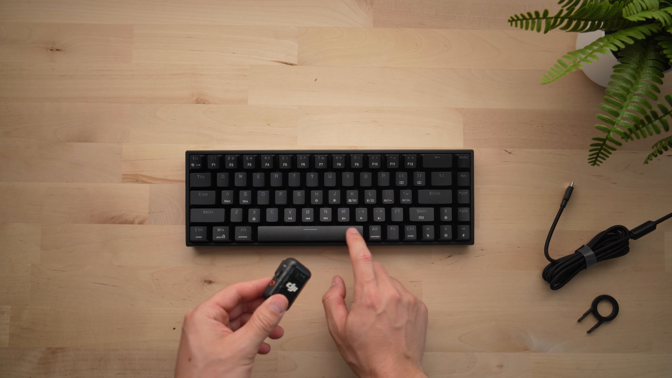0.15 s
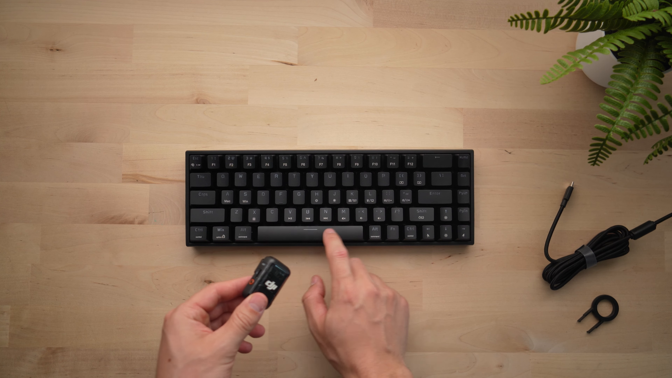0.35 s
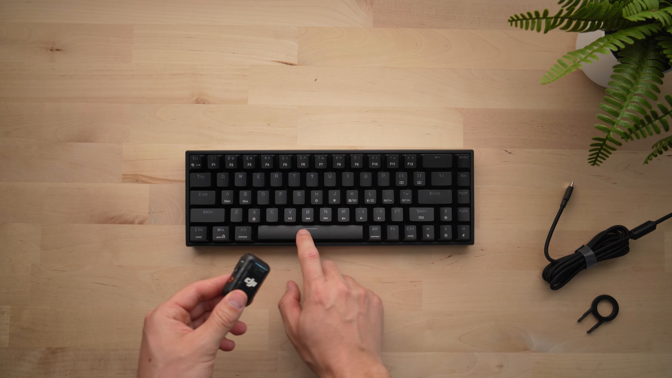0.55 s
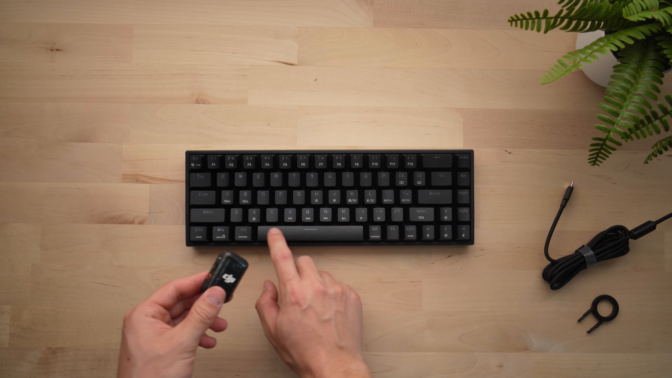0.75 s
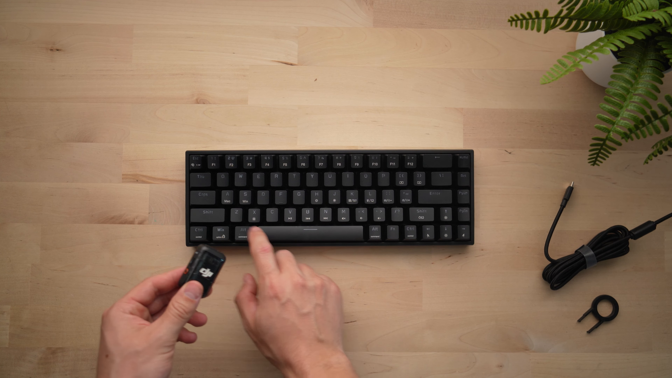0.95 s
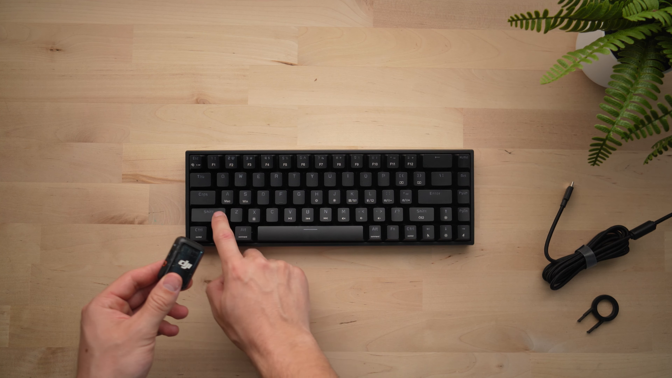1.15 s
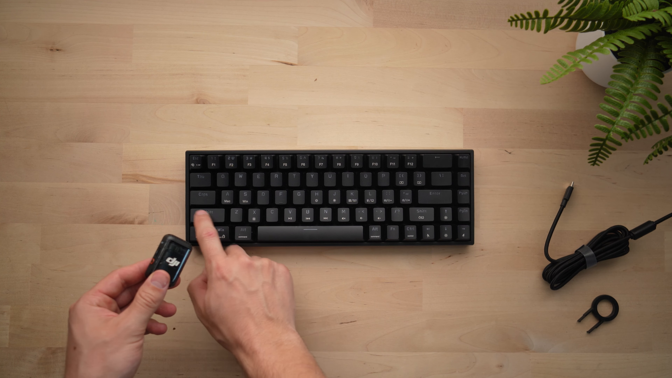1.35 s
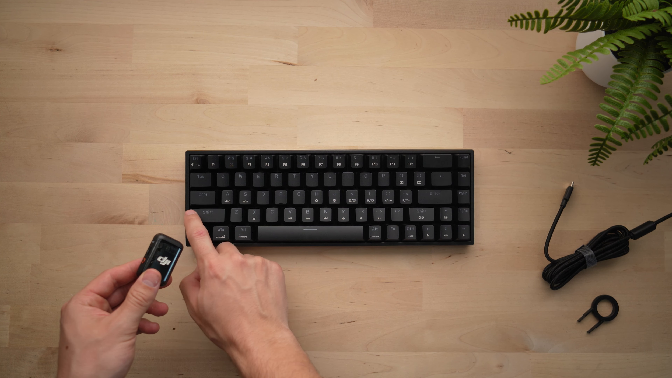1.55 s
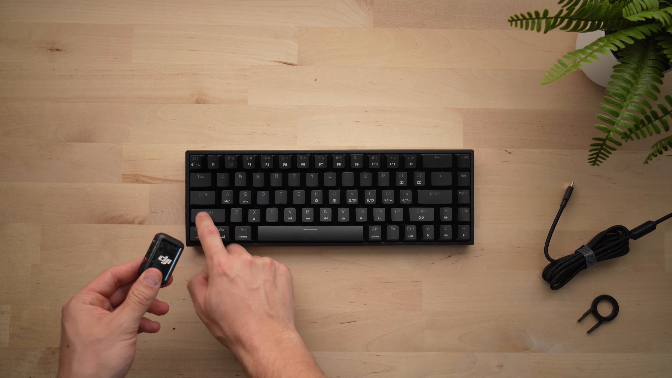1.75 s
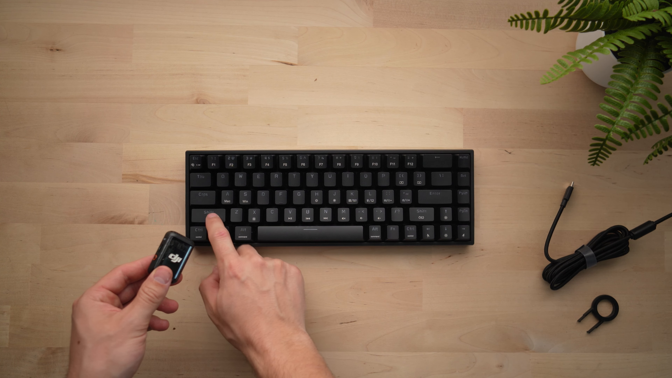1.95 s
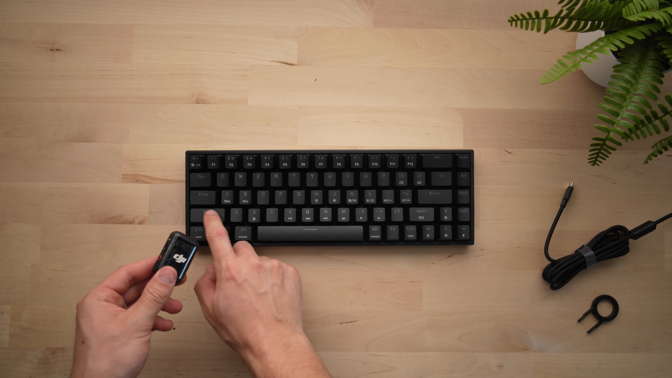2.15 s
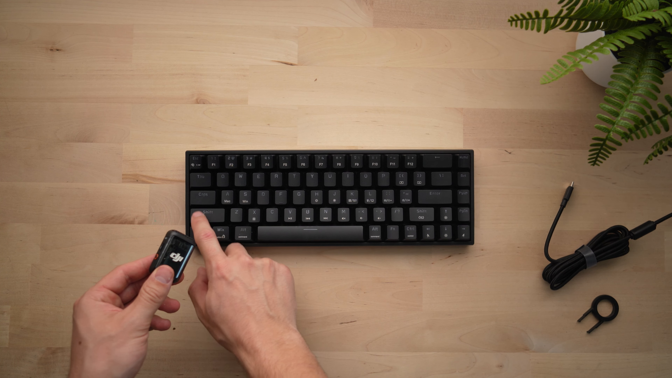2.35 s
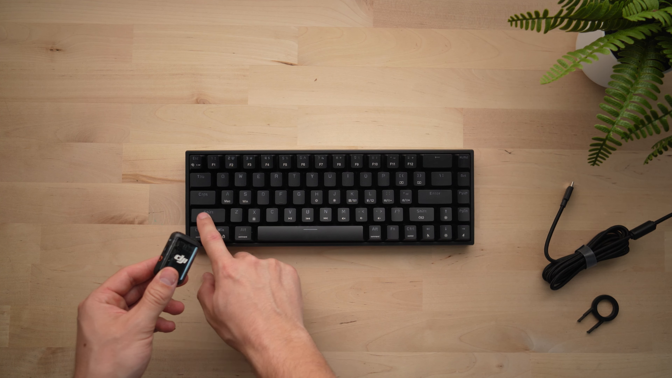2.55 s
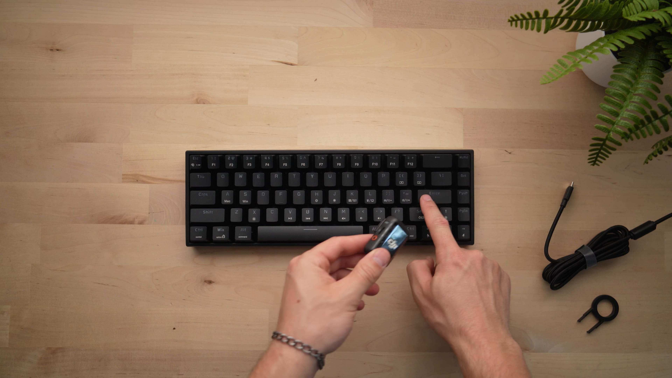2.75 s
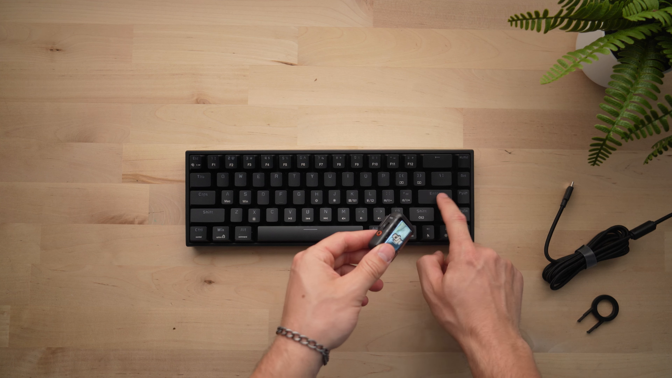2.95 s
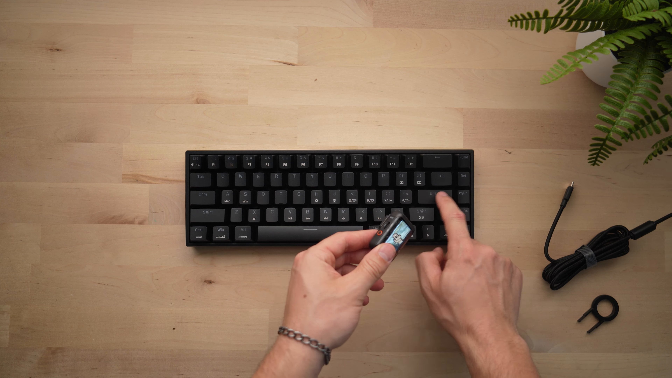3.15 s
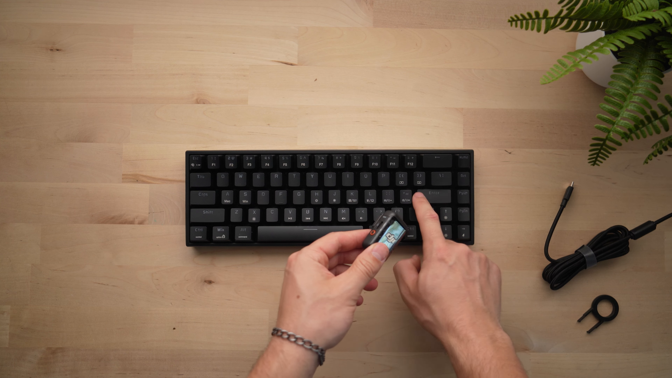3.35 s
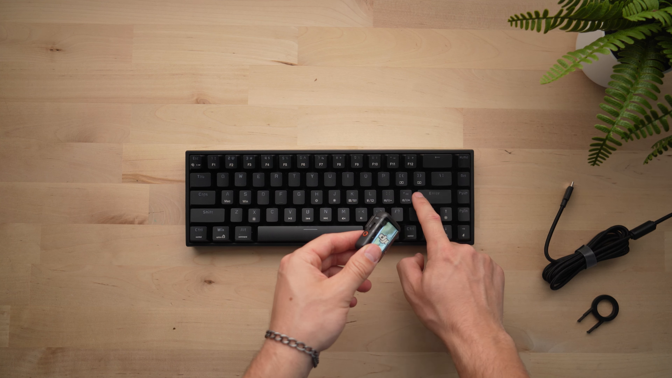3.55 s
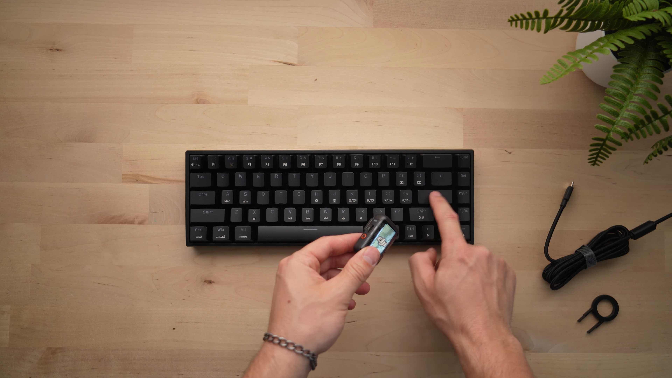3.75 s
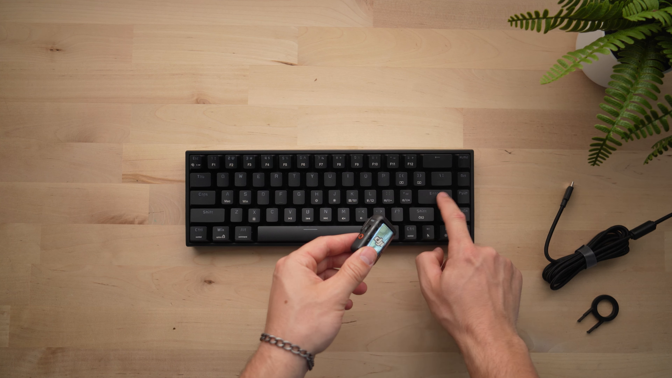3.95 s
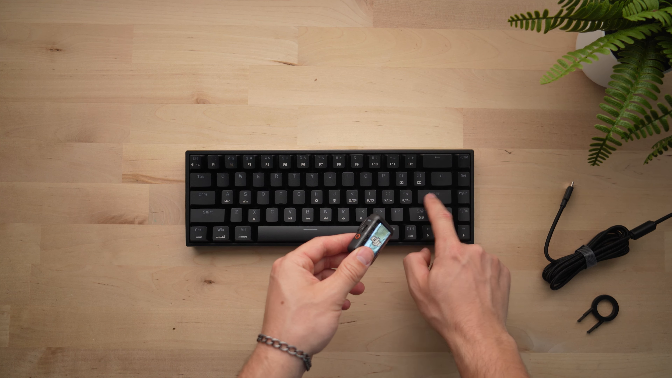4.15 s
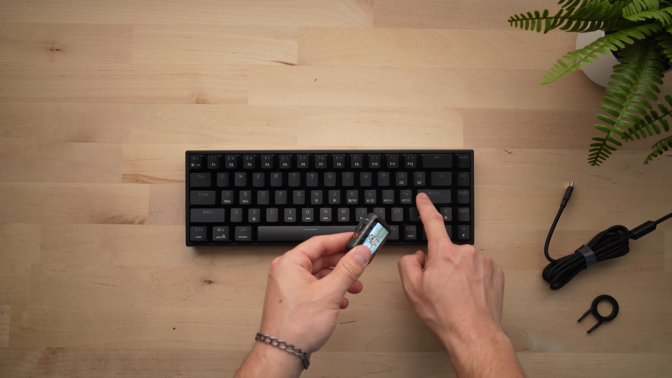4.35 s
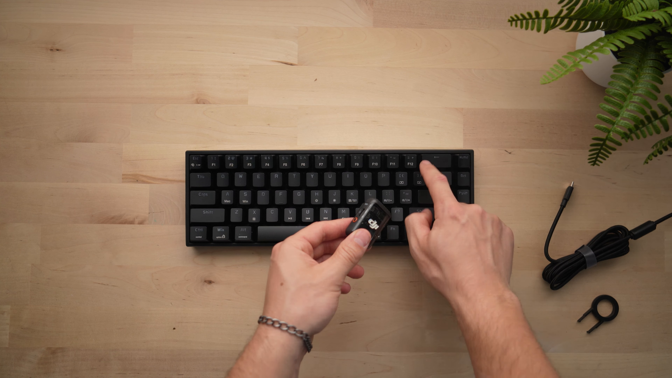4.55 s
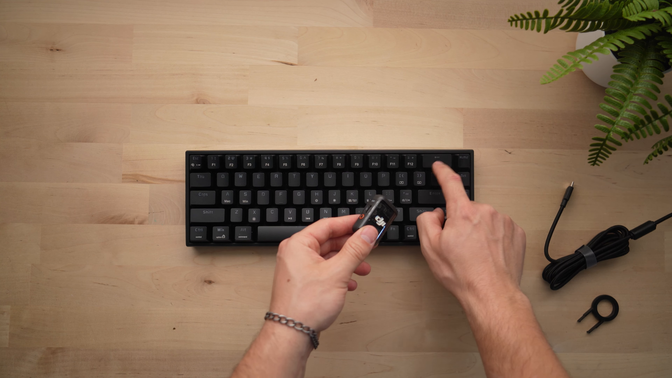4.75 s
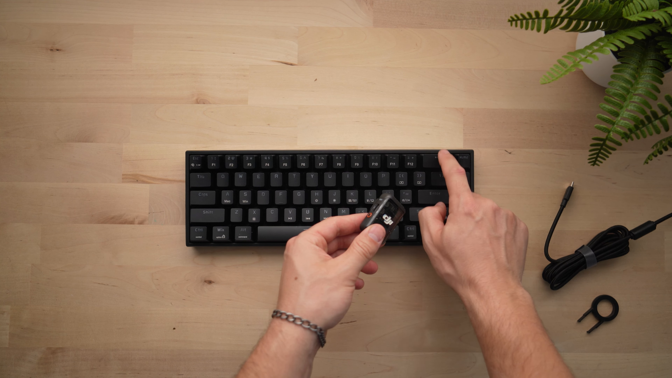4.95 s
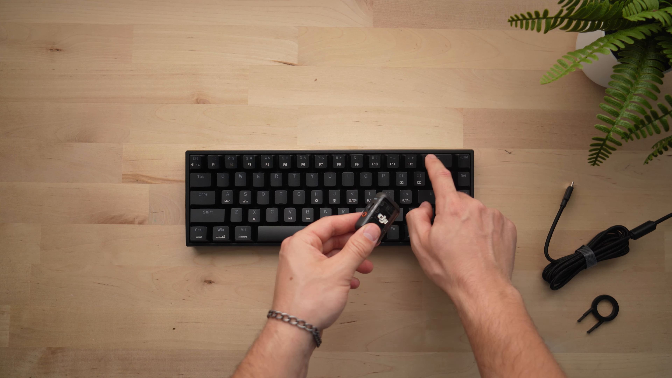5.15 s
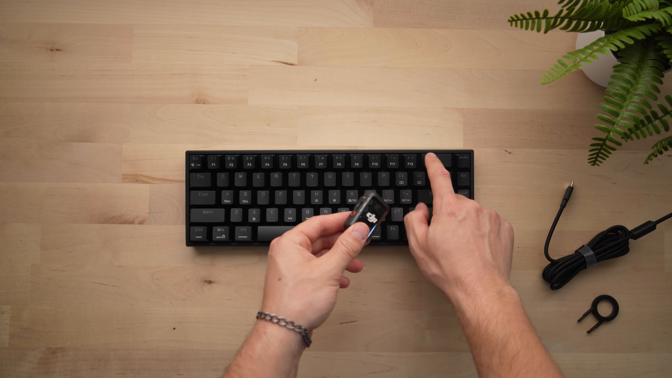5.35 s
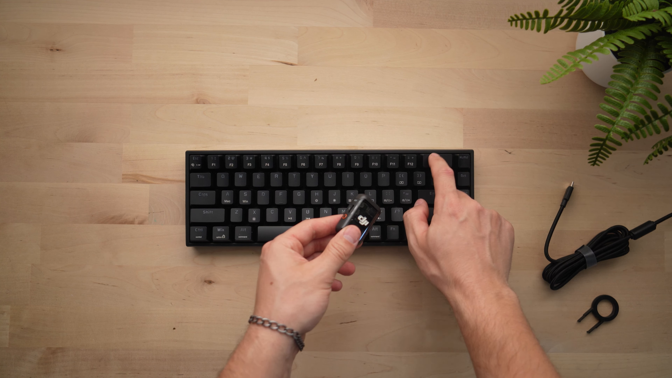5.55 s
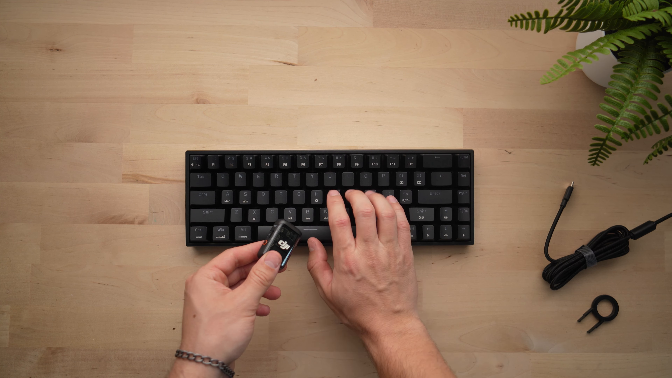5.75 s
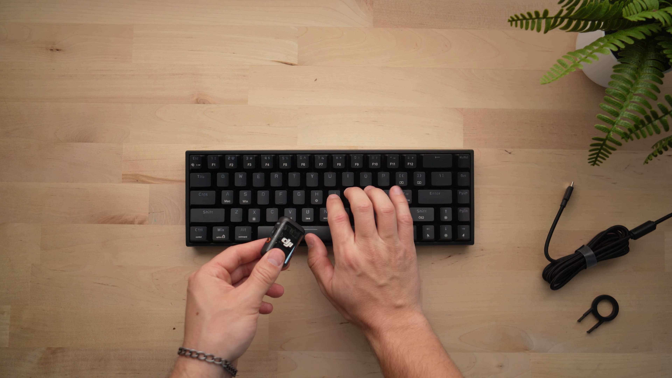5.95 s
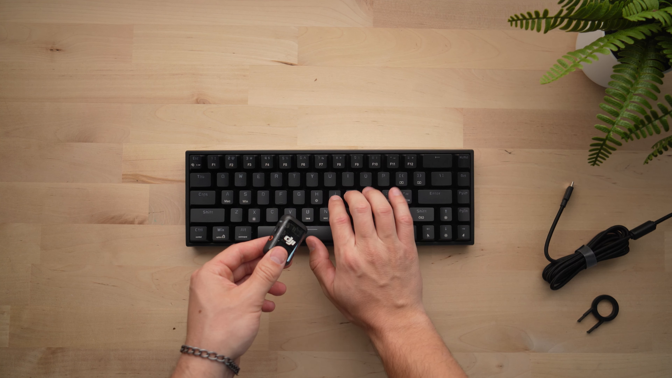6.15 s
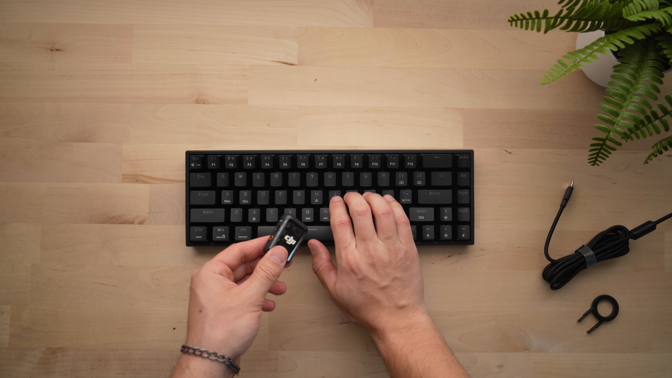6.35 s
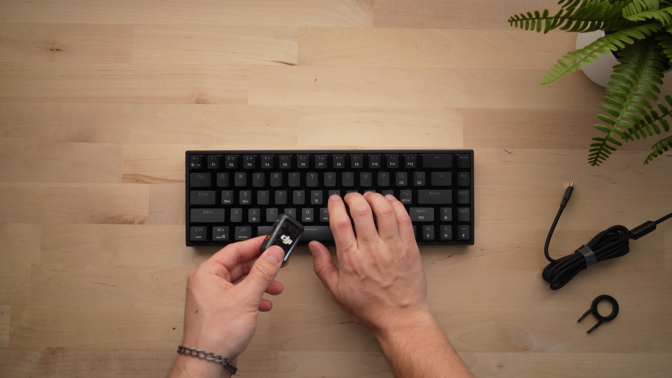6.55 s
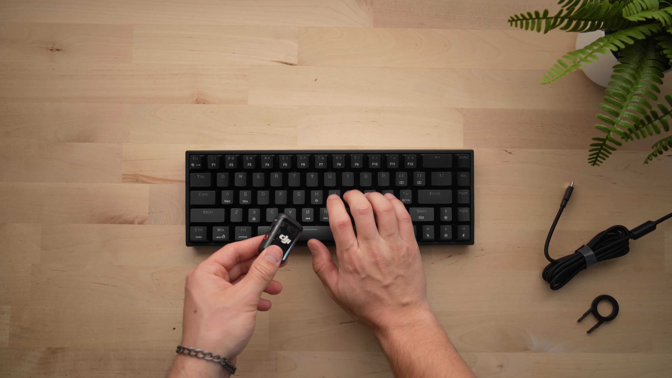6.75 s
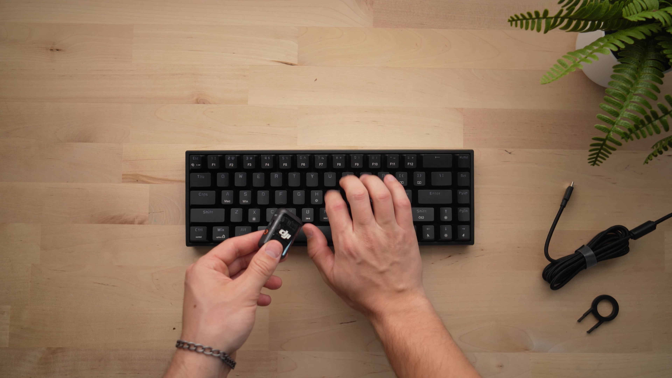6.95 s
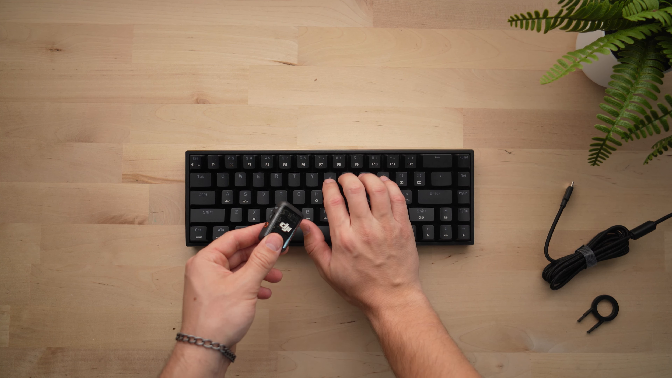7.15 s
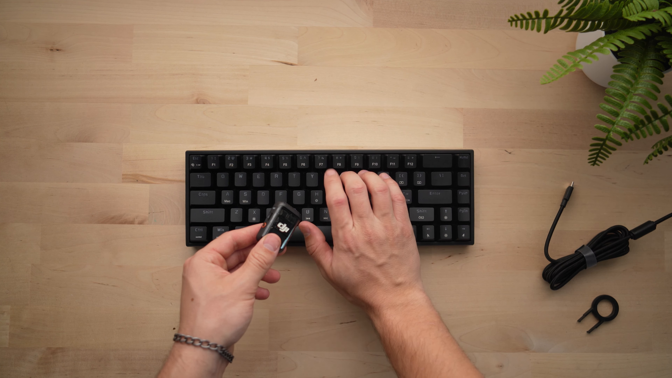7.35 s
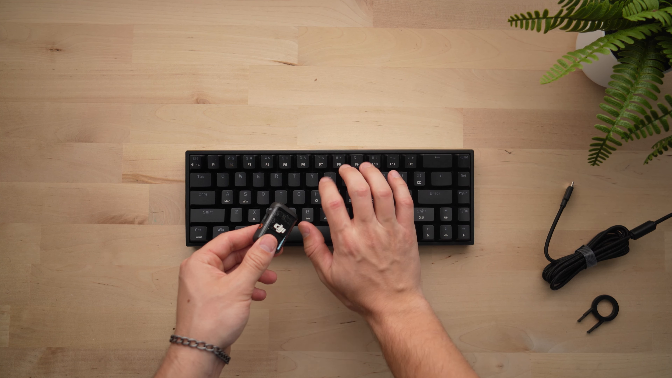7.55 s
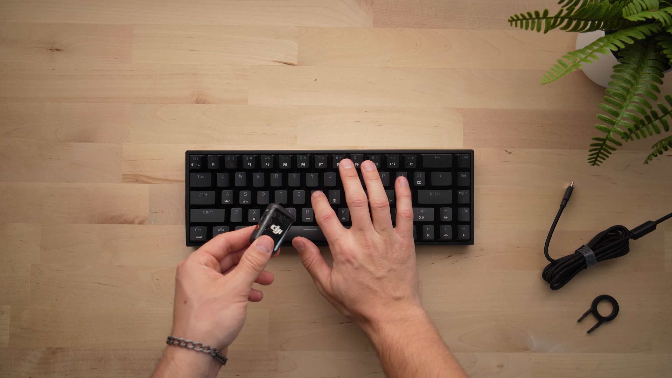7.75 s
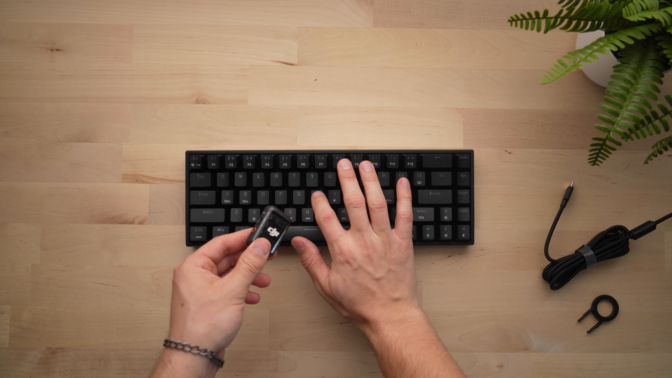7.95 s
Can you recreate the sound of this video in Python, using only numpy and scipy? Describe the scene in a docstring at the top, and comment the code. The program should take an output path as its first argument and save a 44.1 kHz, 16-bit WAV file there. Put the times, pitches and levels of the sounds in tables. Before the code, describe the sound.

Close, dry clacks of a mechanical keyboard on a wooden desk: even single-key taps, a burst of tangled rapid typing, a last firm click.

```python
"""The keys of a mechanical keyboard on a wooden desk: one finger taps space, shift, enter and backspace, the
hand types on the letters, and a last hard tap falls on a far key at the right. Each blow rings damped modes of
case, cap, switch and desk, then rattles; a tapped key clacks at the bottom and again as it springs back.
Noise grains make the finger ticks, the rub of the stems and the fidgets of resting fingers.
It is heard close up in a quiet room: a diffuse noise tail and a steady coloured hush."""
import sys
import numpy as np
from scipy import signal
from scipy.fft import rfft, irfft
from scipy.io import wavfile

SR = 44100
rng = np.random.default_rng(int(sys.argv[2]) if len(sys.argv) > 2 else 0)


def bounce(signal):
    """Save signal as a 16-bit WAV file at the path given by the first command-line argument."""
    frames = np.transpose(np.atleast_2d(signal))
    limited = np.clip(frames, -1, 1)
    pcm = np.round(limited * 32767).astype(np.int16)
    wavfile.write(sys.argv[1], SR, pcm)


N = 353461

# All table levels are relative: each layer adds its own trim.
# Taps on each key: [t/s, press level/dB, finger landing level/dB, hold/s, release level/dB, release looseness/dB]
SPACE_TAPS = [(0.004, -35, -50, 0.077, -41.5, -5), (0.1617, -33.5, -40, 0.073, -34, -2),
              (0.3096, -31, -39.5, 0.079, -31, -3), (0.4777, -30.5, -42, 0.069, -28, -6.5),
              (0.6336, -28.5, -50.5, .0687, -30, 0.5), (0.7987, -30.5, -43.5, 0.063, -33, 3),
              (0.9553, -33.5, -42, 0.087, -38.5, 0)]
SHIFT_TAPS = [(1.231, -35.5, -43, 0.068, -35, 1), (1.3856, -33.5, -46.5, 0.069, -31.5, -1),
              (1.552, -36.5, -48, 0.069, -39.5, 1), (1.7056, -37, -46, 0.071, -35.5, -3.5),
              (1.87, -37, -49, 0.068, -37.5, 0.5), (2.0223, -40.5, -41.5, 0.071, -38, 1),
              (2.1748, -37.5, -40.5, 0.071, -30, 8.5), (2.3307, -34, -49, 0.076, -38.5, 2),
              (2.4911, -35.5, -50, 0.068, -33, 3), (2.635, -33, -45, 0.084, -42, 7)]
ENTER_TAPS = [(2.8072, -33, -56, 0.076, -33.5, -5), (2.9683, -32.5, -40.5, 0.079, -32.5, -3),
              (3.1261, -32, -36.5, 0.082, -33, 2), (3.2905, -30, -66, 0.085, -30, -4.5),
              (3.4511, -30.5, -48, .0959, -37.5, -9.5), (3.608, -33.5, -63, 0.089, -38, 4.5),
              (3.7692, -32.5, -48.5, 0.083, -35, 2), (3.9403, -33, -42.5, .081, -38, 0),
              (4.0961, -33.5, -52, 0.087, -35.5, 1.5), (4.2726, -34, -58, 0.072, -31.5, -5),
              (4.421, -31, -61.5, 0.11, -35, -4)]
BACKSPACE_TAPS = [(4.6574, -26, -39, 0.064, -34.5, -4), (4.8046, -31.5, -42.5, 0.076, -40.5, 5),
                  (4.9643, -32, -40, .0737, -37.5, -1), (5.1253, -32, -53, 0.081, -38.5, -5),
                  (5.2764, -29.5, -52, 0.071, -36, -0.5), (5.4285, -29.5, -50, 0.068, -36.5, -5),
                  (5.5733, -30.5, -51, 0.094, -45.5, 9)]
# A last hard tap on a far key at the right: same columns
FAR_KEY_TAPS = [(7.8665, -26, -42, .0704, -35, 4)]
# Blows on the letter keys: [t/s, clack level/dB, tick level/dB, looseness/dB]
LETTER_BLOWS = [(5.8893, -39.5, -49, -12), (5.9044, -32, -43.5, -1.5), (5.9335, -37.5, -51.5, -4.5),
                (5.974, -45, -51.5, 7), (6.0227, -39.5, -51, 6.5), (6.0699, -44, -43, 3),
                (6.1186, -40.5, -54, 0), (6.1305, -37, -50, -3), (6.149, -42, -60, -4),
                (6.1928, -38.5, -46.5, -9), (6.237, -48, -57, 9), (6.256, -42.5, -52, 9),
                (6.2799, -36.5, -48, 6.5), (6.3176, -33.5, -38, -10.5), (6.3796, -41, -52, -1),
                (6.3971, -39.5, -51, -6), (6.4205, -37.5, -58, 0), (6.4443, -37.5, -47, -6),
                (6.5, -48, -56, 8), (6.5181, -43, -51, 5), (6.5345, -37.5, -49, 3),
                (6.5762, -36.5, -39.5, -2), (6.6275, -37, -48, 1.5), (6.6385, -38, -47, -3),
                (6.653, -40.5, -60, -5), (6.704, -39.5, -50.5, -4), (6.7514, -41.5, -49, 5),
                (6.761, -41, -44, 1), (6.7713, -39, -43.5, 5), (6.8073, -32, -36.5, -5),
                (6.8697, -37.5, -44.5, -2), (6.877, -40, -51, 1.5), (6.9008, -37, -54, 0),
                (6.9285, -37, -46.5, -6), (6.9947, -43, -52, 6), (7.0011, -40.5, -52, 9),
                (7.0115, -37, -46, 6), (7.0607, -37.5, -41, -1), (7.1416, -43.5, -47, -3.5),
                (7.1569, -38, -44.5, -3), (7.1758, -38, -51, -3), (7.208, -43.5, -58.5, -1),
                (7.281, -43.5, -52, 5.5), (7.2904, -38, -39.5, 5), (7.3203, -36, -35, -2),
                (7.3788, -43, -49, 5), (7.4, -41, -49, -6), (7.4614, -39.5, -50.5, -3),
                (7.503, -38, -45.5, -1), (7.577, -40, -45, 12.5), (7.5897, -40, -40, 7)]

# Modes of each key with the case under it: [f/Hz, resonance height level/dB, t60/s]
SPACE_MODES = [(250.6, -1.5, 0.12), (340, 0.5, 0.035), (341, 6.5, 0.089), (402, -7.5, 0.079),
               (580, -9, 0.021), (708, -6, 0.013), (840, -13, 0.021), (1520, -4, 0.0076),
               (1735, 0.5, 0.014), (2385, 7.5, 0.012), (3010, 2, 0.0037), (3355, 0, 0.0031),
               (4700, -7, 0.001), (5200, -5, 0.0018), (6840, -18, 0.0014), (9600, -21, 0.0012),
               (12500, -25, 0.0018)]
SHIFT_MODES = [(341.5, -10.5, 0.039), (478, -8, 0.082), (565, -8, 0.13), (672, 1.5, 0.13),
               (878, -8.5, 0.029), (1256, 2, 0.0085), (1695, 2.5, 0.027), (2007, 2, 0.015),
               (2590, -1.5, 0.0068), (3270, -1, 0.013), (3820, -1.5, 0.011), (4880, -6.5, 0.0035),
               (6170, -0.5, 0.003), (9000, -8.5, 0.0012), (10000, -8.5, 0.0018), (13500, -16, 0.0074)]
ENTER_MODES = [(263, -13, 0.038), (372.3, -9, 0.2), (667, -5.5, 0.081), (731, -1, 0.055), (870, -2, 0.02),
               (1150, -4, 0.015), (1884, -2, 0.011), (2380, -3.5, 0.0032), (3140, 2, 0.0054),
               (4640, -15, 0.0019), (5600, -11.5, 0.0031), (7430, -12, 0.0036), (10650, -20.5, 0.0024),
               (12700, -30, 0.0022)]
BACKSPACE_MODES = [(259, -4.5, 0.043), (363, 1.5, 0.06), (555, -4, 0.04), (762, 5.5, 0.13),
                   (843, 2.5, 0.02), (1196, -6, 0.018), (1667, 0, 0.017), (2050, -9.5, 0.0042),
                   (2490, -2.5, 0.011), (3056, 2, 0.01), (3634, 2.5, 0.012), (4496, -16.5, 0.0094),
                   (5550, -11.5, 0.0064), (7040, -8.5, 0.0039), (9700, -16.5, .004), (10200, -10, 0.0073),
                   (13000, -26, 0.0025)]
LETTER_MODES = [(256, -7, 0.035), (381, -4.5, 0.061), (502, -12, 0.034), (690, -7, 0.045),
                (905, -3.5, 0.078), (1200, -3.5, 0.072), (1470, -11, 0.0024), (2250, 0, 0.0093),
                (2680, 6, 0.01), (3270, 3, 0.0055), (4478, -11, 0.0068), (5300, -16.5, 0.00055),
                (6840, -11.5, 0.001), (7740, -12.5, 0.0019), (9820, -18, 0.0063)]
FAR_KEY_MODES = [(290, -18, 0.043), (357, -5, 0.031), (544, -19, .02), (936, 5, 0.074), (1196, -9, 0.068),
                 (1660, -24, .01), (2010, 1.5, 0.0099), (2690, 6.5, 0.0069), (3420, 0, 0.0031),
                 (5240, -13.5, 0.0023), (7500, -12, 0.00078), (10600, -9, 0.0086), (12400, -24, 0.0041),
                 (14900, -28, .002)]
# Modes of keys hitting their top stop, free of the finger: [f/Hz, resonance height level/dB, t60/s]
SPACE_UP_MODES = [(292, -13.5, 0.022), (396.5, 5.5, 0.087), (537, -12, 0.034), (640, 0, 0.022),
                  (850, -19.5, 0.025), (1310, -1, .018), (1650, -5.5, 0.014), (2346, 6.5, 0.013),
                  (2900, 0, 0.0052), (3400, 4.5, 0.0071), (3920, -19.5, 0.012), (5400, -13.5, 0.0037),
                  (6700, -11.5, 0.0037), (9700, -15.5, 0.0021), (12500, -20.5, .002)]
ENTER_UP_MODES = [(280, -2.5, .03), (370, 0, 0.19), (600, -3.5, 0.017), (664, 2, 0.019), (940, -2, 0.024),
                  (1282, -5.5, 0.0074), (2160, 0, 0.0052), (3170, 2, 0.0046), (4200, -6.5, .005),
                  (5540, -8, 0.0044), (7300, -12, 0.0025), (10630, -20, .002), (12730, -35.5, .002)]
BACKSPACE_UP_MODES = [(275, -9.5, 0.027), (366, 3.5, 0.11), (614, -2, 0.048), (760, -1.5, 0.069),
                      (900, -3, 0.023), (1570, -2, 0.0096), (1880, 1.5, 0.015), (2580, -2, 0.008),
                      (3260, -3, 0.0044), (4080, -11, 0.0046), (5560, -8.5, 0.0036), (7330, -5.5, 0.0084),
                      (10370, -19, .003), (12500, -34, 0.0031)]
# Modes of the wooden desk: [f/Hz, resonance height level/dB, t60/s]
DESK_MODES = [(84, -4.5, 0.086), (95, -7.5, 0.059), (135.4, -8, 0.044), (178.6, 2.5, 0.13),
              (222.2, 1, 0.074)]

# Spectrum of finger ticks and stem rub: [f/Hz, level per Hz/dB]
TOUCH_COLOUR = [(40, -43), (150, -19.5), (400, -11), (1000, -10), (1800, -2), (2900, -2.5), (4400, -11.5),
                (7300, -15.5), (11000, -17.5), (16000, -35)]
# Spectrum of the room's reflections at their onset: [f/Hz, level per Hz/dB]
ROOM_COLOUR = [(80, -3.5), (300, 13.5), (700, 6.5), (1400, 2.5), (3000, -5.5), (6000, -2), (10000, -4),
               (16000, -4)]
# Decay of the room's reflections: [f/Hz, t60/s]
ROOM_T60 = [(100, 0.49), (500, 0.3), (2500, 0.35), (6000, 0.3), (14000, 0.41)]
# Spectrum of the background hush: [f/Hz, level per Hz/dB]
FLOOR_COLOUR = [(20, -14), (70, -13), (150, -8.5), (300, -17), (1000, -26.5), (3000, -27), (8000, -33.5),
                (12500, -35), (14000, -42), (17000, -42.5)]

# modes below the first edge belong to the case, below the second to the cap, the rest to the switch
CASE_TOP_HZ, CAP_TOP_HZ = 1100, 4500
HOLLOW_DB, HOLLOW_T60 = -2.5, 0.059
SEATING_DB = 9.5  # extra rattle of the switch parts
LINGER_T60 = 0.22  # s, one mode of the case rings on faintly
# a harder stroke is brighter: dB of tick and of thud for each dB of clack
TICK_FOLLOWS, THUD_FOLLOWS = 1.25, 0.6
# no two strokes land alike: spread of the clack's tilt (dB per octave) and of its rattle (dB)
TILT_SPREAD_DB, RATTLE_SPREAD_DB = 0.5, 4
# for each dB of looseness a letter tilts duller (dB per octave), and any key thuds more (dB)
LETTER_DULLING, LOOSE_THUD = 1, 0.27
# the finger lifts this long before the spring-back, gaining these dB for each dB of looseness
LIFT_LEAD_S, LIFT_FOLLOWS = 0.0087, 0.49
# it eases off about this long before the release (jitter as a share), more softly than it lifts
EASE_LEAD_S, EASE_JITTER, EASE_DB = 0.023, 0.25, -7
ROOM_DB, FLOOR_DB = -23, -79
LEVEL_WINDOW_S = 0.01
CUTOFF_HZ = 16300


def key(strokes, modes, linger_hz, linger_db, clack_db, tilt_db, tick_db, thud_db, desk_db,
        rattle_db, loose_db, rattle_t60, detune, dulling=0):
    """A stroke rings the case (thud), the keycap (clack) and the small parts of the switch (tick)."""
    modes, out = np.array(modes), np.zeros(N)
    case, cap, switch = np.split(modes, np.searchsorted(modes[:, 0], [CASE_TOP_HZ, CAP_TOP_HZ]))
    short, long = seconds(0.04), seconds(0.16)
    usual = np.mean([clack for s, clack, *rest in strokes])
    for s, clack, tick, looseness in strokes:
        thud = thud_db + THUD_FOLLOWS * (clack - usual) + LOOSE_THUD * looseness
        tilt = tilt_db - dulling * looseness + TILT_SPREAD_DB * rng.standard_normal()
        rattle = rattle_db + looseness + RATTLE_SPREAD_DB * rng.standard_normal()

        knock = struck(cap, short, tilt, spread_db=0.75, detune=0.028)
        knock = rattled(knock, short, rattle + loose_db, rattle_t60, grain_db=2.0, plate_db=8.5, rise_s=0.0029)
        add(out, s, cut(knock, [950, 4500], "band"), clack + clack_db)

        # the stem seats within a few milliseconds, in a burst of tiny contacts
        snap = struck(switch, short, 0, spread_db=2.0, detune=0.054)
        snap = rattled(snap, short, rattle + SEATING_DB, t60=0.0082, grain_db=3.5, plate_db=-10.0, rise_s=0.00073)
        add(out, s, cut(snap, [4200, 14000], "band"), tick + tick_db)

        # between its strong modes the case has many weak ones that blur into a short hollow noise
        hollow = coloured(rng.standard_normal(len(long)), case[:, :2])
        hollow = cut(hollow, [230, 1150], "band") * from_db(-60 * long / HOLLOW_T60)
        linger = np.sin(2 * np.pi * linger_hz * long) * from_db(-60 * long / LINGER_T60)
        body = unit(struck(case, long, 0, spread_db=1.24, detune=detune))
        body += from_db(HOLLOW_DB) * unit(hollow)
        body += from_db(linger_db) * unit(linger)
        add(out, s, cut(body, [170, 1400], "band"), thud)

        # the feet of the case pass the blow on to the desk
        desk = struck(np.array(DESK_MODES), long, 0, spread_db=2.5, detune=0.064)
        add(out, s, cut(desk, [70, 300], "band", order=3), thud + desk_db)
    return out


def struck(modes, t, tilt_db, spread_db, detune):
    """Damped sines of alternating sign; every blow weights and tunes them a little differently."""
    hz, db, t60 = modes.T[:, :, None]
    weight, shift = rng.standard_normal((2, len(modes), 1))
    tilted_db = db + tilt_db * np.log2(hz / hz[0]) + spread_db * weight
    gain = from_db(tilted_db) / t60  # a resonance of given height starts weaker if it rings longer
    sign = (-1) ** np.arange(len(modes))[:, None]
    tones = np.sin(2 * np.pi * hz * (1 + detune * shift) * t)
    return np.sum(sign * gain * from_db(-60 * t / t60) * tones, axis=0)


def rattled(impact, t, rattle_db, t60, grain_db, plate_db, rise_s):
    """After the impact loose parts chatter: tiny contacts ring the same modes again and shake the plate."""
    noise, sizes = rng.standard_normal((2, len(t)))
    rise = 1 - np.exp(-(t / rise_s) ** 2)
    chatter = noise * from_db(grain_db * sizes - 60 * t / t60) * rise
    again = signal.fftconvolve(chatter, impact)[:len(t)]
    rattle = unit(unit(again) + from_db(plate_db) * unit(chatter))
    return unit(impact) + from_db(rattle_db) * rattle


def presses(taps):
    """Each tap drives the key to the bottom, where the finger holds it steady: no added looseness."""
    s, press_db, finger_db, held_s, release_db, looseness = np.transpose(taps)
    return with_ticks(s, press_db, np.zeros(len(s)))


def releases(taps):
    """After the hold the spring throws the key against its top stop, where it is free to rattle."""
    s, press_db, finger_db, held_s, release_db, looseness = np.transpose(taps)
    return with_ticks(s + held_s, release_db, looseness)


def with_ticks(s, db, looseness):
    """Rows of [t/s, clack/dB, tick/dB, looseness/dB]: the tick grows faster with force than the clack."""
    tick_db = db.mean() + TICK_FOLLOWS * (db - db.mean())
    return np.transpose([s, db, tick_db, looseness])


def touches(contacts, touch_db, t60, rise_s, rub_db, rub_t60):
    """A fingertip rocks the cap in its play: a short cluster of weak ticks, then a faint rub."""
    out, t = np.zeros(N), seconds(0.03)
    for s, db in contacts:
        noise, sizes = rng.standard_normal((2, len(t)))
        fading = from_db(-60 * t / t60) + from_db(rub_db - 60 * t / rub_t60)
        grains = noise * from_db(1.9 * sizes) * fading * (1 - np.exp(-t / rise_s))
        add(out, s, coloured(grains, TOUCH_COLOUR), db + touch_db)
    return out


def fingerings(taps, lead_s, lift_db):
    """Rows of [t/s, level/dB]: the finger lands, eases off and lifts, louder if it leaves the cap loose."""
    # it lands one key travel before the press
    rows = [(s - lead_s, finger_db) for s, press_db, finger_db, *rest in taps if s > lead_s]
    for s, clack, tick, looseness in releases(taps):
        db = lift_db + LIFT_FOLLOWS * looseness
        ease_lead = EASE_LEAD_S * (1 + EASE_JITTER * rng.uniform(-0.83, 1))
        rows += [(s - ease_lead, db + EASE_DB), (s - LIFT_LEAD_S, db)]
    return rows


def slides(strokes, slide_db, travel_s):
    """The stem rubs along its housing, growing louder, just before each impact."""
    out, t = np.zeros(N), seconds(travel_s)
    for s, clack, *rest in strokes:
        if s > travel_s:
            rub = coloured(rng.standard_normal(len(t)), TOUCH_COLOUR) * np.sqrt(t)
            add(out, s - travel_s, rub, clack + slide_db)
    return out


def fidgets(start_s, end_s, per_s, db, spread_db, pad_db):
    """Resting fingers jostle neighbouring caps at random: a dull tick and the bump of a soft pad."""
    out, t = np.zeros(N), seconds(0.06)
    for when, size in rng.random((int((end_s - start_s) * per_s), 2)):
        s, level = start_s + when * (end_s - start_s), db - spread_db * size
        grains, pad = rng.standard_normal((2, len(t))) * t
        tick = coloured(grains * from_db(-60 * t / 0.007), TOUCH_COLOUR)
        add(out, s, cut(tick, 6500, "low"), level)
        add(out, s, cut(pad * from_db(-60 * t / 0.042), [95, 190], "band"), level + pad_db)
    return out


def room(x):
    """Diffuse reflections build up after the nearest walls answer and die away band by band."""
    t = seconds(0.6)
    edges = np.geomspace(60, 16000, 9)
    tail = 0
    for low, high in zip(edges, edges[1:]):
        hz = np.sqrt(low * high)
        band = cut(rng.standard_normal(len(t)), [low, high], "band")
        tail = tail + band * from_db(at_hz(ROOM_COLOUR, hz) - 60 * t / at_hz(ROOM_T60, hz))
    build_up = 1 - np.exp(-t / 0.0053)
    return signal.fftconvolve(x, unit(tail * build_up))[:N]


def hush():
    """The quiet background is steady noise with a fixed spectrum."""
    return from_db(FLOOR_DB) * np.sqrt(N) * unit(coloured(rng.standard_normal(N), FLOOR_COLOUR))


def from_db(db):
    """Decibels to gain."""
    return 10 ** (np.asarray(db) / 20)


def unit(x):
    """Scale to an energy of one."""
    return x / np.sqrt(np.sum(x ** 2) + 1e-20)


def at_hz(points, hz):
    """Read a table on a log-frequency axis."""
    f, value = np.transpose(points)
    return np.interp(np.log(hz + 1e-6), np.log(f), value)


def coloured(x, spectrum):
    """Give a noise a spectrum."""
    gain = from_db(at_hz(spectrum, np.fft.rfftfreq(len(x), 1 / SR)))
    return irfft(rfft(x) * gain, len(x))


def cut(x, hz, kind, order=2):
    """Butterworth filter."""
    return signal.sosfilt(signal.butter(order, hz, kind, fs=SR, output="sos"), x)


def seconds(length):
    """A time axis in seconds."""
    return np.arange(int(length * SR)) / SR


def add(track, s, sound, db):
    """Mix a sound in at a time; its energy is that of db held for one level window."""
    start = max(round(s * SR), 0)
    part = track[start:start + len(sound)]
    part += (unit(sound) * from_db(db) * np.sqrt(LEVEL_WINDOW_S * SR))[:len(part)]


def scene():
    """The keys, their small noises, the room and its hush."""
    keys = key(presses(SPACE_TAPS), SPACE_MODES, linger_hz=338, linger_db=-17.5,
               clack_db=1.5, tilt_db=2.7, tick_db=-7, thud_db=-44, desk_db=-9,
               rattle_db=-15, loose_db=5.5, rattle_t60=0.053, detune=0.012)
    keys += key(releases(SPACE_TAPS), SPACE_UP_MODES, linger_hz=405, linger_db=-19.5,
                clack_db=1.5, tilt_db=-2.2, tick_db=-8, thud_db=-47.5, desk_db=-10.5,
                rattle_db=-8, loose_db=12.0, rattle_t60=0.024, detune=0.01)
    keys += key(presses(SHIFT_TAPS), SHIFT_MODES, linger_hz=673, linger_db=-9,
                clack_db=0.0, tilt_db=6, tick_db=-6, thud_db=-46.0, desk_db=-16.5,
                rattle_db=-7.5, loose_db=-3.5, rattle_t60=0.022, detune=0.004)
    keys += key(releases(SHIFT_TAPS), SHIFT_MODES, linger_hz=667, linger_db=-9,
                clack_db=-2.0, tilt_db=5, tick_db=-7, thud_db=-53.0, desk_db=-11.0,
                rattle_db=-10, loose_db=4.5, rattle_t60=0.019, detune=0.0048)
    keys += key(presses(ENTER_TAPS), ENTER_MODES, linger_hz=740.7, linger_db=-11.5,
                clack_db=1.5, tilt_db=3.5, tick_db=-9.5, thud_db=-40.5, desk_db=-18.5,
                rattle_db=-15.0, loose_db=4.5, rattle_t60=0.013, detune=0.005)
    keys += key(releases(ENTER_TAPS), ENTER_UP_MODES, linger_hz=736, linger_db=-11,
                clack_db=-3.5, tilt_db=2, tick_db=-14.5, thud_db=-49.0, desk_db=-13.5,
                rattle_db=-10.5, loose_db=10.0, rattle_t60=0.015, detune=0.006)
    keys += key(presses(BACKSPACE_TAPS), BACKSPACE_MODES, linger_hz=735, linger_db=-11.5,
                clack_db=-1.0, tilt_db=0.5, tick_db=-7, thud_db=-41.0, desk_db=-12.5,
                rattle_db=-13, loose_db=9.0, rattle_t60=0.015, detune=0.005)
    keys += key(releases(BACKSPACE_TAPS), BACKSPACE_UP_MODES, linger_hz=738, linger_db=-10.5,
                clack_db=-0.5, tilt_db=2.0, tick_db=-8.5, thud_db=-48.5, desk_db=-8.5,
                rattle_db=-7, loose_db=8.0, rattle_t60=0.019, detune=0.0078)
    keys += key(LETTER_BLOWS, LETTER_MODES, linger_hz=914, linger_db=-15.5,
                clack_db=1.0, tilt_db=1.5, tick_db=0.5, thud_db=-55.5, desk_db=-9.5,
                rattle_db=-15.0, loose_db=9.0, rattle_t60=0.025, detune=0.028, dulling=LETTER_DULLING)
    far_blows = np.vstack([presses(FAR_KEY_TAPS), releases(FAR_KEY_TAPS)])
    keys += key(far_blows, FAR_KEY_MODES, linger_hz=940, linger_db=-12,
                clack_db=0.0, tilt_db=-3.0, tick_db=-9, thud_db=-54, desk_db=-5.0,
                rattle_db=-15, loose_db=7.5, rattle_t60=0.019, detune=0.0091)

    contacts = fingerings(SPACE_TAPS, lead_s=0.013, lift_db=-50.5)
    contacts += fingerings(SHIFT_TAPS, lead_s=0.0118, lift_db=-56.5)
    contacts += fingerings(ENTER_TAPS, lead_s=0.0123, lift_db=-50)
    contacts += fingerings(BACKSPACE_TAPS, lead_s=0.0082, lift_db=-52.5)
    contacts += fingerings(FAR_KEY_TAPS, lead_s=0.0073, lift_db=-52)
    keys += touches(contacts, touch_db=-0.5, t60=0.009, rise_s=0.00037, rub_db=-13.5, rub_t60=0.099)

    taps = SPACE_TAPS + SHIFT_TAPS + ENTER_TAPS + BACKSPACE_TAPS
    rubbing = np.vstack([presses(taps), releases(taps), LETTER_BLOWS])
    keys += slides(rubbing, slide_db=-22.5, travel_s=0.011)
    keys += fidgets(start_s=5.86, end_s=7.58, per_s=34, db=-53.5, spread_db=9.5, pad_db=-11.5)
    return (keys + from_db(ROOM_DB) * room(keys) + hush())[None]


def record(dry):
    """A steep elliptic low-pass cuts the top."""
    return signal.sosfilt(signal.ellip(10, 0.2, 80, CUTOFF_HZ, fs=SR, output="sos"), dry)


dry = scene()
out = record(dry)
bounce(out)
```